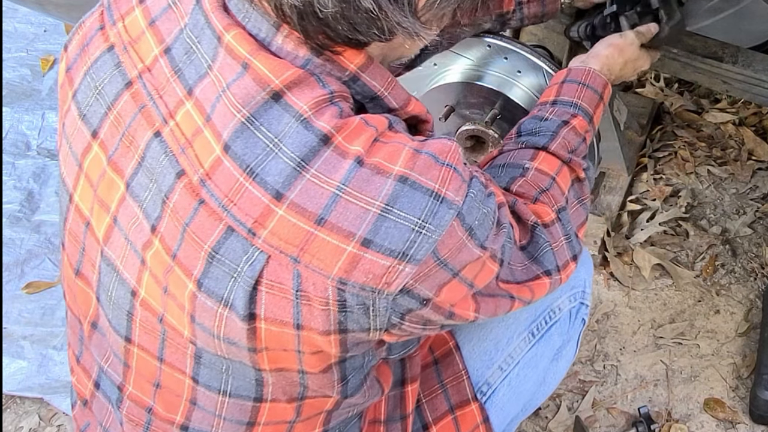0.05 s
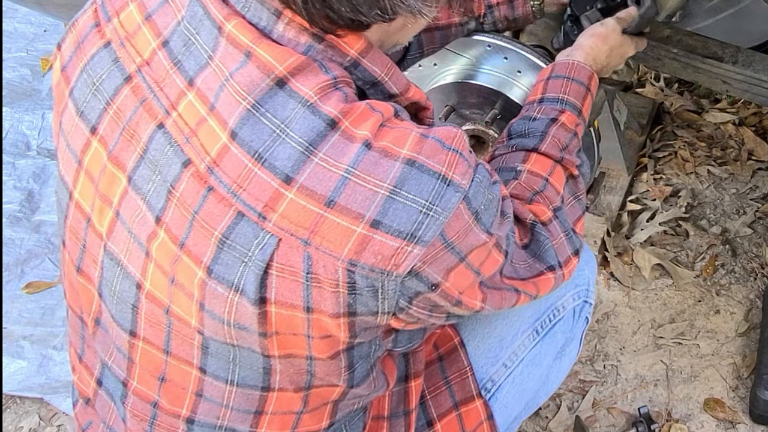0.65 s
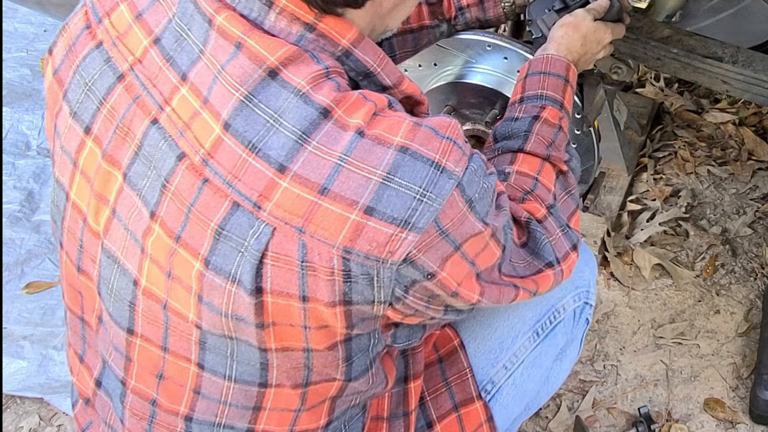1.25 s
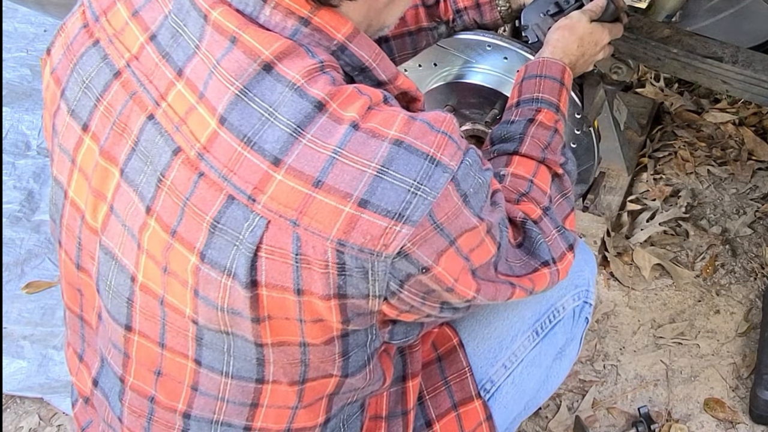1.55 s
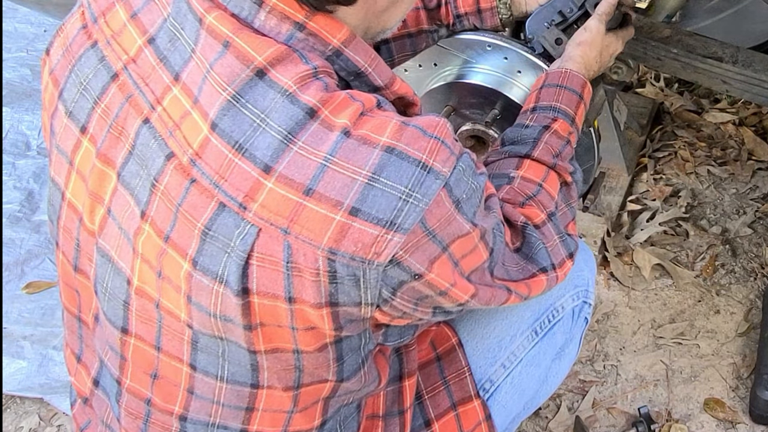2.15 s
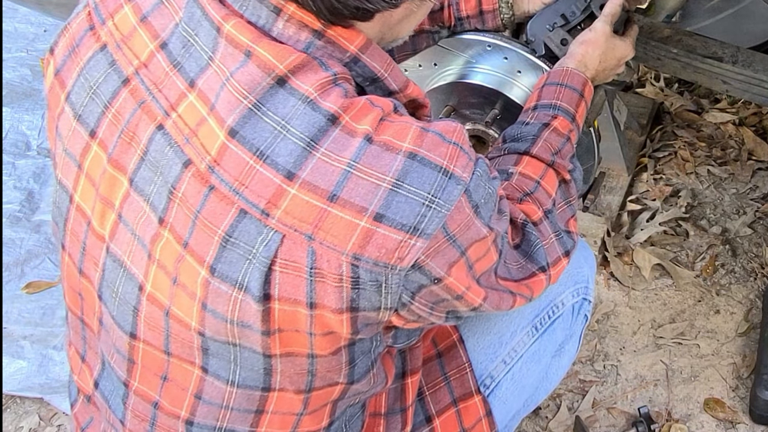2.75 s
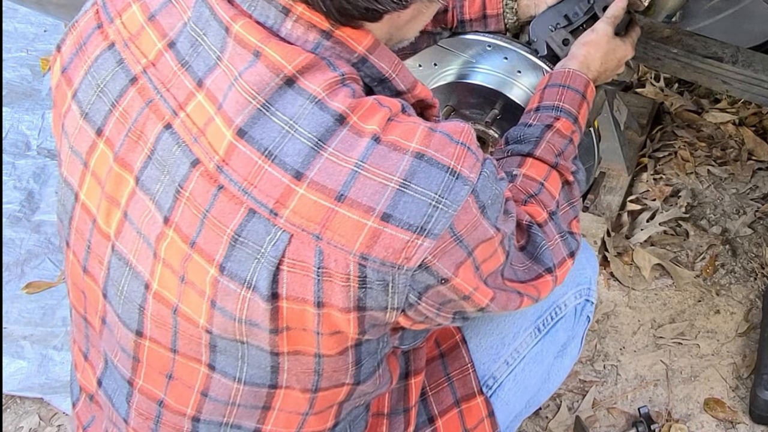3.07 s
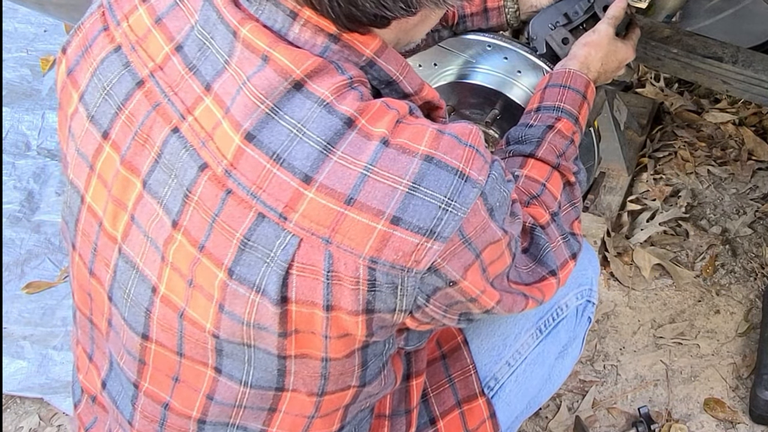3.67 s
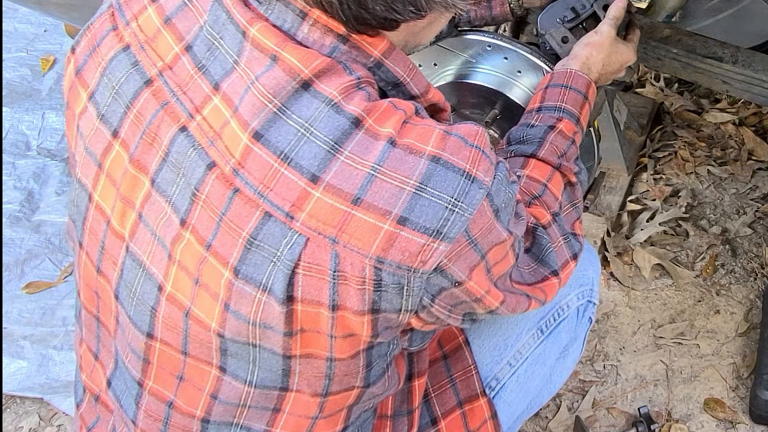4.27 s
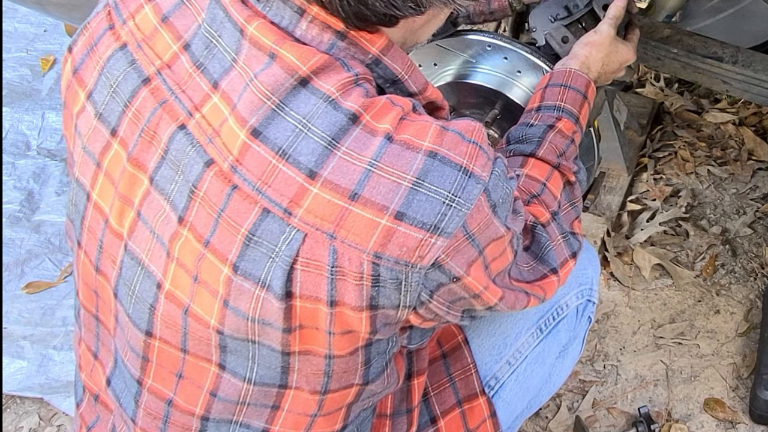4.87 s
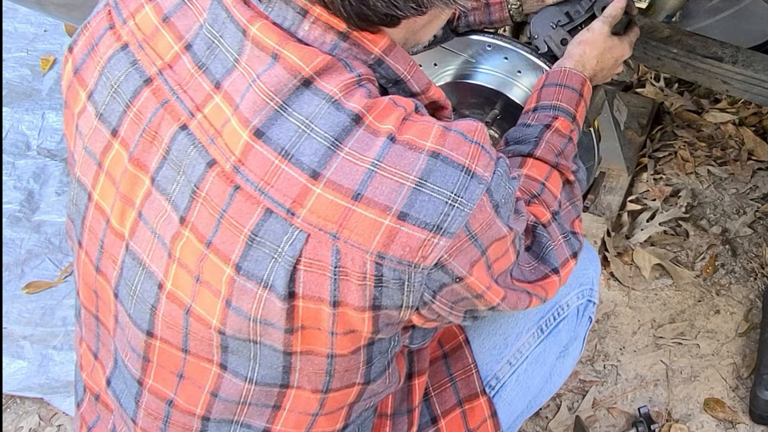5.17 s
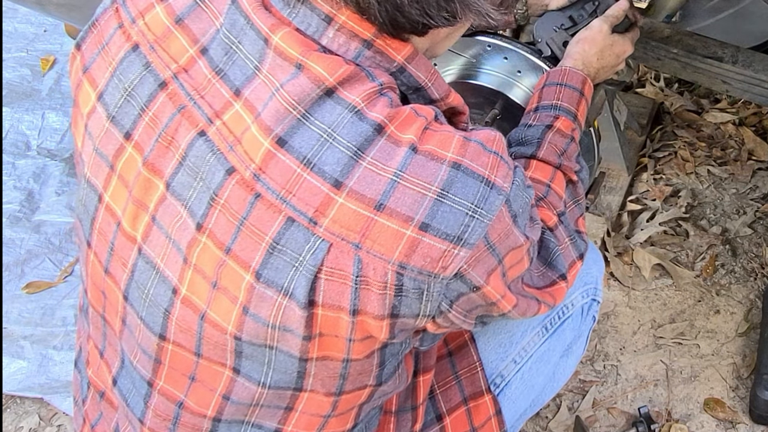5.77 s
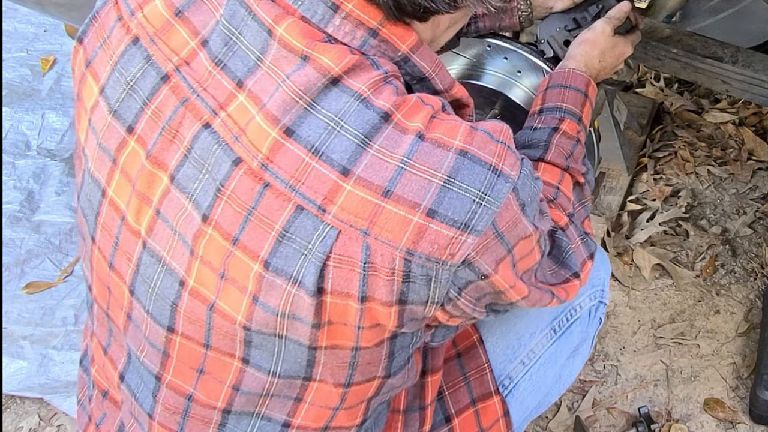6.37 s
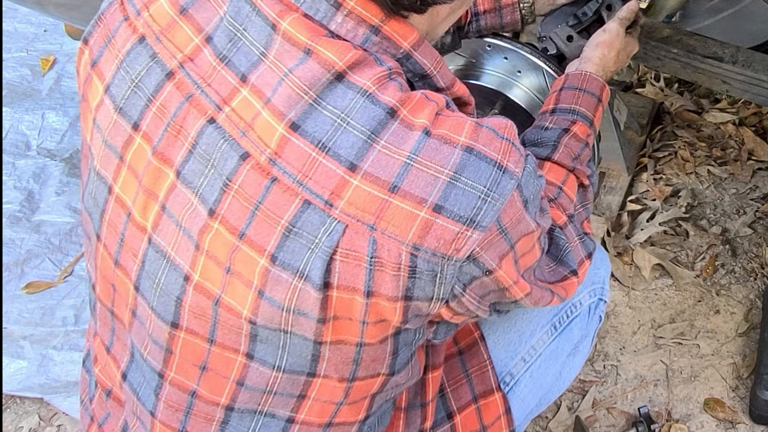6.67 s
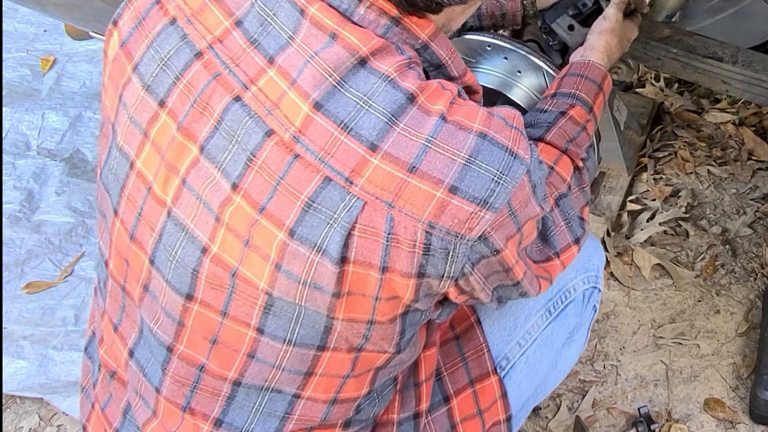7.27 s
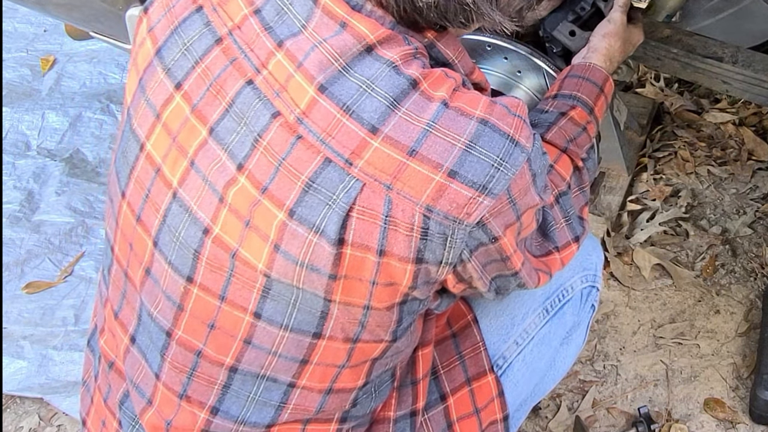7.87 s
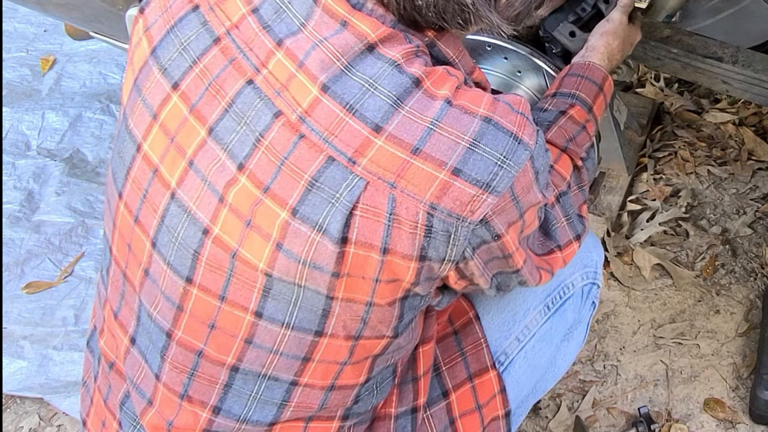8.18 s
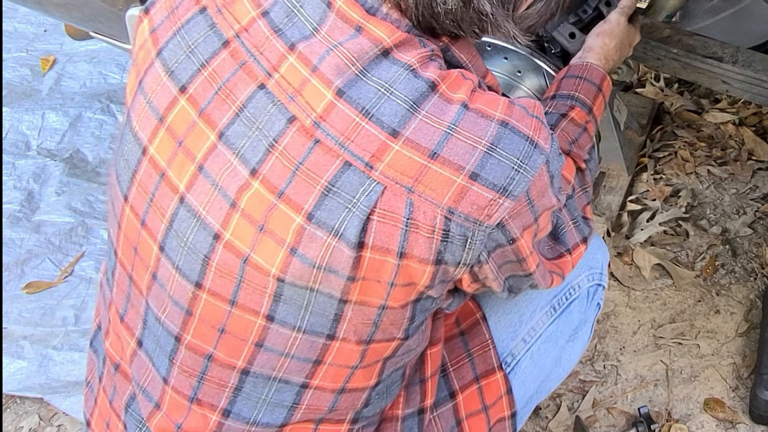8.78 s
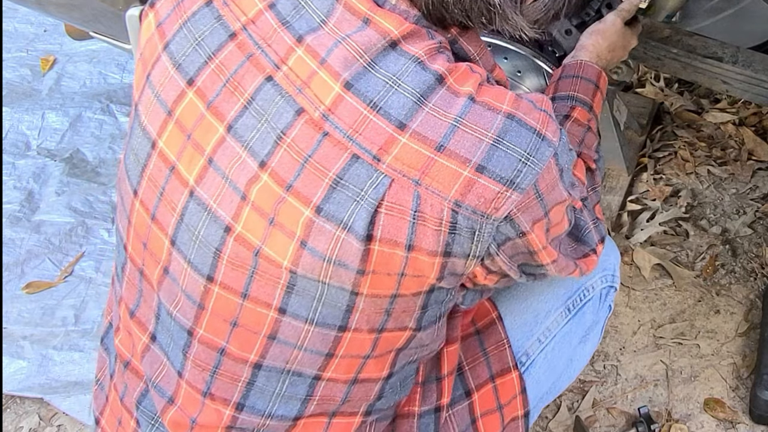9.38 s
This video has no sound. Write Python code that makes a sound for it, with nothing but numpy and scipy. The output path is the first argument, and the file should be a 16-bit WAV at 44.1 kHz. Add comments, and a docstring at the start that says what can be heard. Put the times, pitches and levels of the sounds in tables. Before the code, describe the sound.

A low, distant traffic rumble and soft outdoor air run throughout, with a faint engine drone coming and going. A far bird repeats a short falling whistle every second or two, with a couple of chirps. Close by, steel brake parts are handled. A light ringing knock comes at 1.6 seconds, followed by soft rubs of sleeves and metal until about 2.7. Around 3.9 to 4 seconds the bracket clinks sharply and a pad rattles briefly. Small taps and tiny squeaks lead to a loud clink at 4.7, with a smaller one just after. Soft knocks follow at 5 and 5.5 seconds. At 6.2 a pad scrapes and clicks into its clip, then comes a faint dull thud. At 7.2 the caliper knocks loudly against the disc, ringing briefly. At 9.2 a second pad scrapes and snaps sharply home, with a small click at 9.6.

```python
"""In a yard, a brake caliper is fitted by hand. Impacts excite the damped modes of the steel: bracket,
pad and pin clink, and the caliper knocks against the disc. Friction makes the pads scrape into their
spring clips before they snap home, and sleeves rustle between the blows. Far off, trees scatter the
whistles and chirps of birds, over the rumble of traffic and the drone of an engine."""
import sys
import numpy as np
from scipy import signal
from scipy.fft import rfft, irfft, next_fast_len
from scipy.io import wavfile
from scipy.ndimage import map_coordinates

SR = 44100
rng = np.random.default_rng(int(sys.argv[2]) if len(sys.argv) > 2 else 0)


def int16_out(signal):
    """Quantize to a 16-bit WAV file."""
    q = np.round(np.clip(np.atleast_2d(signal).T, -1, 1) * 32767)
    wavfile.write(sys.argv[1], SR, q.astype(np.int16))


N = 424683

# left-right likeness of near and far sources: (frequency [Hz], coherence [-1 to 1])
NEAR_COHERENCE = [(1500, 0.99), (3500, 0.21), (6000, 0.27), (9000, 0)]
FAR_COHERENCE = [(60, 0.93), (130, 0.95), (300, 0.76), (600, 0.3), (1200, -0.56), (3000, 0.48)]
# friction of cloth and skin: (frequency [Hz], spectral level [dB])
CLOTH_SPECTRUM = [(300, -16), (1500, -4), (2500, 5), (4000, 8), (7000, 2), (9500, -14), (15800, -20)]
# reverberation among the trees: (frequency [Hz], t60 [s])
TREE_DECAY = [(1000, 0.44), (7000, 1.46)]


def contact(bracket_db, pad_db, pin_db, tick_db):
    """Impact excitation: a contact ticks and rings three parts, whose dense modes blur into a clack."""
    # modes of each part: (frequency [Hz], level [dB], t60 [s])
    bracket_modes = [(1430, -13.5, 0.041), (1700, -6, 0.0286), (1896, 1.5, 0.042), (2615, -7.5, 0.017),
                     (3600, -25, 0.061)]
    pad_modes = [(2670, -17.5, 0.059), (3670, -15, 0.069), (3660, -9.5, 0.03), (4240, -15.5, 0.0286),
                 (5364, 1.5, 0.043), (6000, -21.5, 0.034), (6760, -14, 0.024), (11500, -30.5, 0.053)]
    pin_modes = [(4540, -1, 0.064), (8700, -32, .04), (14700, -26.5, 0.064)]
    # impact noise: (frequency [Hz], spectral level [dB])
    tick_spectrum = [(500, -19), (1500, 1.5), (3500, -7.5), (6000, -0.5), (8500, -6), (12000, -7.5),
                     (15800, -12)]
    clack_spectrum = [(600, -8), (1400, 1.5), (2000, 9.5), (3000, 4), (4000, 10.5), (5500, -10),
                      (7000, -14), (10000, -29), (15800, -40)]
    tick = amp(tick_db) * noise(tick_spectrum, NEAR_COHERENCE, SR) * fade(0.035)
    clack = noise(clack_spectrum, NEAR_COHERENCE, SR) * fade(0.055) * (1 - fade(0.0017))
    clack *= amp(bracket_db - 21) + amp(pad_db - 19)
    bracket = amp(bracket_db) * ring(bracket_modes, spread=0.65)
    pad = amp(pad_db) * ring(pad_modes, spread=0.5)
    pin = amp(pin_db) * ring(pin_modes, spread=0.5)
    return bracket + pad + pin + tick + clack


def clinks():
    """Free vibration: the bracket drops on the caliper, and two lightly damped modes outlast the rest."""
    # (time [s], bracket [dB], pad [dB], tick [dB], low mode [dB], high mode [dB])
    drops = [(3.466, -52, -50, -53.5, -80, -85), (3.921, -24, -39, -48, -66, -64),
             (4.0085, -26, -39, -46, -55.5, -71), (4.7426, -19.5, -24, -54.5, -62.5, -56.5),
             (4.830, -36.5, -43.5, -72, -74, -61.5)]
    out = np.zeros((2, N))
    for time, bracket_db, pad_db, tick_db, low_db, high_db in drops:
        linger = amp(low_db) * tone(hz=1879, t60=1.15) + amp(high_db) * tone(hz=2328, t60=0.42)
        add(out, time, contact(bracket_db, pad_db, bracket_db - 25, tick_db) + linger)
    return out


def knocks():
    """The casting hits disc and hub and bounces once; a softer impact puts less energy in high modes."""
    # (time [s], disc [dB], bounce [dB], treble slope [dB/octave], hub [dB])
    blows = [(1.563, -49, -0.5, -3, -47.5), (4.977, -59.5, -30, -8, -58), (5.518, -44.5, -20, -15.5, -55.5),
             (7.1756, -24, -1, -7.5, -59)]
    # modes of each part: (frequency [Hz], level [dB], t60 [s])
    disc_modes = [(1254, -1.5, 0.11), (1485, -8, 0.15), (1660, -9, 0.16), (1900, -4, 0.18), (1970, -1, 0.1),
                  (2340, 8, 0.08), (2470, 14.5, 0.062), (2490, 3, 0.11), (2930, 15.5, 0.049),
                  (3000, 2, 0.041), (3280, 9, 0.043), (3710, 6, 0.03), (5550, 15.5, 0.018), (6675, 4, 0.05)]
    hub_modes = [(416, -11.5, 0.1), (828, -2.5, 0.12), (1355, 0.5, 0.075), (1555, -1.5, 0.054),
                 (1830, -7.5, 0.14)]
    # impact noise: (frequency [Hz], spectral level [dB])
    knock_spectrum = [(180, -62), (300, -10), (459, -21.5), (540, -20), (692, -19), (1060, -35),
                      (1250, -12), (2170, -6), (2450, -2), (2960, -0.5), (4150, -11.5), (5640, -11.5),
                      (10000, -42), (13000, -76), (22000, -120)]
    out = np.zeros((2, N))
    for time, disc_db, bounce_db, slope_db, hub_db in blows:
        softness = lambda hz: amp(slope_db * np.log2(np.clip(hz, 1800, 6000) / 1800))
        for delay, force_db in ((0, 0.0049), (0.007, bounce_db)):
            body = amp(-5) * noise(knock_spectrum, [(1000, 0.47), (6000, 0.074)], SR) * fade(0.1)
            ringing = amp(-19.5) * ring(disc_modes, spread=0.34, scatter=np.pi)
            disc = amp(disc_db) * filtered(body + ringing, softness)
            hub = amp(hub_db) * ring(hub_modes)
            add(out, time + delay, amp(force_db) * (1 - fade(0.003)) * (disc + hub))
    return out


def pad_slides():
    """Sliding friction: each pad chatters along its clip, then snaps home and rings seat and clip."""
    # (start [s], seated [s], scrape [dB], swell [dB], snap [dB], relative seat level [dB], clip [dB])
    inner_moves = [(6.1885, 6.1995, -27, 2.5, -37.5, -31, -46)]
    outer_moves = [(9.163, 9.173, -30.5, 2, -38, -28.5, -49.5), (9.171, 9.1872, -21.5, 22, -15, -24, -33),
                   (9.6185, 9.6205, -57, 3, -49, -28.5, -58)]
    # friction noise: (frequency [Hz], spectral level [dB])
    inner_scrape = [(410, -60.5), (700, -38.5), (1130, -49.5), (1260, -4), (1430, 4.5), (1590, -11),
                    (2040, -9), (2230, -16.5), (3530, -18), (5790, -8), (7810, -8), (10000, -16.5),
                    (11700, -3), (14800, -13.5), (15800, -15.5)]
    outer_scrape = [(400, -19), (900, -14), (1450, 0.5), (2150, 3.5), (2600, -8), (4600, -10), (6000, -4.5),
                    (6900, 1), (7400, 3.5), (7900, -3.5), (8700, -11), (9900, -23), (12300, -9),
                    (13400, -4), (14200, -2), (15300, -5.5), (15800, -8.5)]
    # modes of the seats and clips: (frequency [Hz], level [dB], t60 [s])
    inner_seat = [(1246, -4, 0.067), (1297, -2.5, .06), (1455, -4, 0.069), (1900, -10.5, .16),
                  (1930, -19.5, .08), (2466, -11.5, 0.11), (3235, -5.5, .06), (4000, -12.5, 0.15)]
    outer_seat = [(743, -31, 1), (1110, -8, 0.045), (1360, -17, .05), (1375, 0, 0.048), (1530, 2.5, 0.063),
                  (1730, -3, 0.049), (1894, 3, 0.051), (2040, -6, 0.0685), (2884, -7, 0.076)]
    inner_clip = [(5426, -8, 0.08), (6492, -7, 0.07), (8516, 0, 0.056), (10790, -6, 0.049),
                  (11160, -10, 0.083), (12010, -14, 0.15), (12690, -10, 0.083), (13840, -1, 0.051),
                  (14450, -5, 0.058)]
    outer_clip = [(1870, 3, 0.16), (4210, 2, 0.062), (5900, 8.5, 0.027), (6440, -8, 0.091),
                  (7100, -1, 0.085), (7355, 5.5, .07), (7500, -1.5, 0.078), (7540, -13, 0.27),
                  (7650, -25, 0.44), (8400, -10, 0.11), (14100, -5, 0.08), (14111, -4, .09)]
    out, t = np.zeros((2, N)), clock()
    for moves, scrape, seat, clip in ((inner_moves, inner_scrape, inner_seat, inner_clip),
                                      (outer_moves, outer_scrape, outer_seat, outer_clip)):
        for start, seated, scrape_db, swell_db, snap_db, seat_db, clip_db in moves:
            length = max(seated - start, 0.005)
            push = amp(swell_db * (np.minimum(t / length, 1) - 1)) * (1 - fade(0.016)) ** 2
            release = np.exp(-np.log(1000) * np.maximum(t - length, 0) / 0.048)
            chatter = noise(scrape, NEAR_COHERENCE, SR, grain_db=2.5)
            add(out, start, amp(scrape_db) * push * release * chatter)
            snap = noise(scrape, NEAR_COHERENCE, SR) * fade(0.013)
            add(out, seated, amp(snap_db) * snap + amp(clip_db) * ring(clip, spread=0.87))
            add(out, seated - 0.002, amp(seat_db - 7) * ring(seat, spread=0.42, scatter=np.pi))
    return out


def rattle(time=3.9429, flight_s=0.0164, restitution=0.66):
    """Inelastic collisions: the loose pad bounces on its pin, ever faster, softer and duller."""
    out = np.zeros((2, N))
    for bounce in range(4):
        pad_db = -32.5 - 2.1 * bounce
        soft_db = pad_db - 5.5 * bounce
        add(out, time, contact(soft_db - 5.5, pad_db, pin_db=soft_db + 0.5, tick_db=soft_db - 11.5))
        time += flight_s * restitution ** bounce
    return out


def touches():
    """Light impacts of a pad's edge on the steel excite mainly the pad's own modes."""
    # (time [s], pad [dB], tick [dB])
    taps = [(4.0055, -54, -50), (4.358, -52, -53.5), (4.533, -46.5, -56.5), (4.563, -53, -49),
            (4.6205, -51, -64), (4.632, -54.5, -67), (4.690, -46, -57), (7.105, -72, -50.5),
            (8.739, -80.5, -60.5)]
    out = np.zeros((2, N))
    for time, pad_db, tick_db in taps:
        add(out, time, contact(pad_db - 8, pad_db, pad_db - 11, tick_db))
    return out


def squeaks(width_s=0.0034):
    """Stick-slip oscillation: steel on steel holds one pitch for a few milliseconds."""
    # (time [s], frequency [Hz], level [dB])
    slips = [(3.89, 3660, -52), (4.568, 3980, -44.5), (4.583, 3920, -42)]
    out, t = np.zeros((2, N)), clock() - 0.5
    for time, hz, db in slips:
        add(out, time - 0.5, amp(db) * np.exp(-(t / width_s) ** 2) * np.sin(2 * np.pi * hz * t))
    return out


def rubs():
    """Stick-slip friction of sleeves and hands drives the steel's modes, less so in a bright stroke."""
    # (centre time [s], width [s], level [dB], spectral slope [dB/octave])
    strokes = [(.17, .03, -69.5, -1), (1.895, .037, -58, 3.5), (2.235, 0.033, -64.5, -7.5),
               (2.494, 0.013, -69, 2), (2.735, 0.017, -62, 12.5), (4.342, 0.041, -71, 7),
               (4.686, .036, -60.5, 9), (7.82, .065, -75, 8), (9.32, 0.018, -67, -2.5)]
    # modes of the dragged steel: (frequency [Hz], level [dB], t60 [s])
    steel_modes = [(1300, 3, 0.051), (1615, 2.5, 0.052), (1910, -8, 0.21), (2446, 8.5, 0.057),
                   (2610, -7, 0.062), (4270, -9.5, 0.14), (4870, -2.5, 0.055), (5370, -1, 0.04),
                   (6810, -3.5, .03)]
    out, t = np.zeros((2, N)), clock() - 0.5
    for time, width, db, slope_db in strokes:
        stroke = np.exp(-(t / width) ** 2)
        slips = unit(amp(3.5 * wobble(220, SR)))
        friction = slips * noise(CLOTH_SPECTRUM, NEAR_COHERENCE, SR, slope_db=slope_db)
        force = slips * rng.standard_normal((1, SR))
        steel = unit(signal.fftconvolve(force, ring(steel_modes), axes=1)[:, :SR])
        add(out, time - 0.5, amp(db) * stroke * (friction + amp(1 - 0.34 * slope_db) * steel))
    return out


def bumps():
    """A cushioned impact carries little treble: an arm thuds against the work without ringing it."""
    # (centre time [s], width [s], level [dB])
    thuds = [(6.405, 0.049, -61.5)]
    # soft impact noise: (frequency [Hz], spectral level [dB])
    thud_spectrum = [(200, -2), (390, 4), (600, -14), (1500, -30), (3000, -28), (6000, -42)]
    out, t = np.zeros((2, N)), clock() - 0.5
    for time, width, db in thuds:
        pressure = amp(db) * np.exp(-(t / width) ** 2)
        add(out, time - 0.5, pressure * noise(thud_spectrum, NEAR_COHERENCE, SR))
    return out


def fidgets(count=22):
    """Tiny impacts of fingers and grit give off decaying noise bursts at random moments."""
    out, size = np.zeros((2, N)), SR // 8
    for moment, strength in rng.random((count, 2)):
        tick = noise(CLOTH_SPECTRUM, NEAR_COHERENCE, size, grain_db=2.5, slope_db=2.5)
        add(out, moment * N / SR, amp(-77 + 6 * strength) * tick * fade(0.07)[:size])
    return out


def bird_whistles(length_s=0.3, start_hz=3329, fall_hz=390):
    """Frequency modulation: a whistle holds, then falls with a growing burr; trees scatter it to a haze."""
    # (time [s], relative level [dB])
    notes = [(-.1, -57.5), (.476, -62), (1.918, -62), (2.53, -62), (4.134, -61), (5.895, -61.5),
             (7.31, -61.5)]
    song, progress = np.zeros(N), np.minimum(clock() / length_s, 1)
    swell = np.abs(np.sin(np.pi * progress)) ** 0.52 * amp(-6 * progress)
    hz = start_hz - fall_hz * progress ** 2.1
    for time, db in notes:
        burr = 0.06 * progress ** 1.5 * wobble(260, SR)
        phase = 2 * np.pi * np.cumsum(hz * (1 + burr)) / SR
        add(song, time, amp(db + 6.5) * swell * (np.sin(phase) + amp(-20.5) * np.sin(2 * phase)))
    return amp(-12.5) * song + echo(song, TREE_DECAY)


def bird_chirps(arch=0.13):
    """A parabolic frequency sweep, loudest at its top, reverberates among the trees."""
    # (time [s], length [s], top frequency [Hz], level [dB])
    calls = [(1.287, .025, 6930, -66), (7.905, 0.056, 3980, -63)]
    song = np.zeros(N)
    for time, length, top_hz, db in calls:
        progress = np.minimum(clock() / length, 1)
        hz = top_hz * (1 - arch * (2 * progress - 1) ** 2)
        swell = np.sin(np.pi * progress) ** 2
        add(song, time, amp(db) * swell * np.sin(2 * np.pi * np.cumsum(hz) / SR))
    return song + amp(-7) * echo(song, TREE_DECAY)


def outdoors():
    """Long waves stay coherent: far traffic rumbles almost in mono under diffuse air and microphone hiss."""
    # loudness contours: (time [s], relative level [dB])
    traffic_levels = [(0.1, -56), (3.44, -55), (6.81, -54), (7.41, -56.5), (7.97, -51), (8.08, -54.5),
                      (8.97, -53), (9.55, -56)]
    air_levels = [(0.1, -68), (7.15, -67.5), (7.31, -68.5), (9.55, -71)]
    # background noise: (frequency [Hz], spectral level [dB])
    traffic_spectrum = [(12, -37.5), (20, -21.5), (49, 0.5), (102, 0.5), (122, -2.5), (141, -10.5),
                        (188, -11), (260, -15), (297, -15.5), (342, -19), (380, -16.5), (450, -47),
                        (580, -57.5), (990, -120)]
    air_spectrum = [(250, -14), (450, 1.5), (800, 2), (1350, -2), (2100, -13), (3500, -21.5), (6000, -29),
                    (9000, -39.5), (15800, -46.5)]
    hiss_spectrum = [(1500, -9), (4500, -0.5), (4900, 7), (5250, 15), (5600, -1), (7100, 0), (8300, -2.5),
                     (9300, -12), (12000, -7.5), (15500, -7)]
    traffic = amp(curve(traffic_levels) + 1) * noise(traffic_spectrum, FAR_COHERENCE, N)
    air = amp(curve(air_levels) + 5.5) * noise(air_spectrum, FAR_COHERENCE, N)
    hiss = amp(-77.5) * noise(hiss_spectrum, [(1000, 0.024)], N)
    return traffic + air + hiss


def engine(ramp_s=0.4, reference_hz=181.6):
    """Narrow-band noise: a far engine pulls at steady speeds, droning in and out of the rumble."""
    # (start [s], end [s], pitch [Hz], level [dB])
    pulls = [(2.0, 5.8, 182.7, -66.5), (6.95, 8.1, 210, -67.5)]
    # drone at the reference pitch: (frequency [Hz], spectral level [dB])
    drone_spectrum = [(150, -40.5), (172, -7), (181, -2.5), (190, -17.5), (215, -18.5), (400, -80.5)]
    out, t = np.zeros((2, N)), np.arange(N) / SR
    for start, end, pitch_hz, db in pulls:
        effort = np.clip(np.minimum(t - start, end - t) / ramp_s, 0, 1) ** 0.5
        spectrum = [(hz * pitch_hz / reference_hz, level) for hz, level in drone_spectrum]
        out += amp(db) * effort * noise(spectrum, FAR_COHERENCE, N)
    return out


def ring(modes, spread=0.88, scatter=0):
    """Modal superposition; spread varies phase between channels (less below 3 kHz), scatter between modes."""
    t, sound = clock(), np.zeros((2, SR))
    for hz, db, t60 in modes:
        level_draw, channel_draw, mode_draw = rng.standard_normal((3, 2, 1))
        phase = spread * min(hz / 3000, 2) * channel_draw + scatter * mode_draw[0]
        sound += amp(db + level_draw) * fade(t60) * np.sin(2 * np.pi * hz * t + phase)
    return sound * (1 - fade(0.0033))


def tone(hz, t60):
    """One damped oscillator, alike in both channels."""
    return fade(t60) * (1 - fade(0.003)) * np.sin(2 * np.pi * hz * clock())


def noise(spectrum, coherence, size, grain_db=0, slope_db=0):
    """Shaped stereo noise of rms 1; grain_db adds millisecond grains, slope_db a tilt per octave."""
    grains = wobble(SR / 44, size)
    white = rng.standard_normal((2, size)) * amp(grain_db * grains)
    angle = lambda hz: np.arccos(np.clip(along(coherence, hz), -1, 1)) / 2
    low_cut = lambda hz: hz ** 2 / (hz ** 2 + (spectrum[0][0] / 2) ** 2)
    colour = lambda hz: low_cut(hz) * amp(along(spectrum, hz) + slope_db * np.log2(hz + 1))
    mid, side = filtered(white, lambda hz: colour(hz) * [np.cos(angle(hz)), np.sin(angle(hz))])
    return unit(np.array([mid + side, mid - side]))


def echo(x, decay):
    """Reverberation: convolution with diffuse reflections, each frequency dying at its own rate."""
    hz, t, bins = signal.stft(rng.standard_normal((2, SR)), SR, nperseg=256)
    damping = np.exp(-np.log(1000) * t / along(decay, hz)[:, None])
    tail = signal.istft(bins * damping, SR, nperseg=256)[1]
    return signal.fftconvolve(np.atleast_2d(x), tail / np.linalg.norm(tail[0]), axes=1)[:, :N]


def filtered(x, response):
    """Linear filtering: the spectrum of x times a frequency response."""
    size = next_fast_len(x.shape[-1] + 8192)
    return irfft(rfft(x, size) * response(np.fft.rfftfreq(size, 1 / SR)), size)[..., :x.shape[-1]]


def add(track, time, sound):
    """Superpose a sound on the track from a time in seconds."""
    start = round(time * SR)
    part = sound[..., max(-start, 0):max(N - start, 0)]
    track[..., max(start, 0):max(start, 0) + part.shape[-1]] += part


def wobble(rate, size):
    """A random curve with rate knots a second."""
    knots = rng.standard_normal(int(size * rate / SR) + 4)
    return map_coordinates(knots, [np.arange(size) * rate / SR], order=1)


def along(points, hz):
    """Interpolate (frequency [Hz], value) points on a log axis."""
    frequencies, values = np.transpose(points)
    return np.interp(np.log(hz + 1), np.log(frequencies + 1), values)


def curve(points):
    """Interpolate (time [s], level [dB]) points at every sample."""
    return np.interp(np.arange(N) / SR, *np.transpose(points))


def fade(t60):
    """Exponential decay of 60 dB in t60 seconds."""
    return np.exp(-np.log(1000) * clock() / t60)


def clock():
    """One second of sample times."""
    return np.arange(SR) / SR


def amp(db):
    """Decibels to gain."""
    return 10 ** (np.asarray(db) / 20)


def unit(x):
    """Scale to rms 1."""
    return x / np.sqrt(np.mean(x ** 2) + 1e-20)


def scene():
    """Direct and reverberant fields add: the work is close, and the knocks carry most into the yard."""
    # balance of the close sounds: (frequency [Hz], left minus right [dB])
    balance = [(1500, -2), (2200, -2), (3700, 3), (5500, -2.5), (7200, -1), (8000, 10.5), (9500, 1.5),
               (12000, 3.5), (14500, 4.5)]
    # reverberation of the yard: (frequency [Hz], t60 [s])
    yard_decay = [(300, 0.35), (2000, 0.45), (7000, 0.48), (15000, 0.25)]
    sides = np.array([[0.5], [-0.5]])
    pads = pad_slides()
    light = clinks() + rattle() + touches() + squeaks() + rubs() + fidgets()
    heavy = knocks() * amp(0.5 * sides)
    radiation = lambda hz: (1j * hz / (350 + 1j * hz)) ** 2  # small parts radiate little bass
    close = filtered(light + pads, lambda hz: radiation(hz) * amp(sides * along(balance, hz)))
    yard = echo(amp(-27) * light + amp(-26.5) * pads + amp(-21.5) * heavy, yard_decay)
    return close + heavy + bumps() + yard + bird_whistles() + bird_chirps() + outdoors() + engine()


def record(dry):
    """Band limiting: a steep low-pass filter removes the highest treble."""
    cutoff_hz, transition_hz = 15950, 400
    return filtered(dry, lambda hz: np.clip((cutoff_hz - hz) / transition_hz + 0.5, 0, 1))


dry = scene()
out = record(dry)
int16_out(out)
```